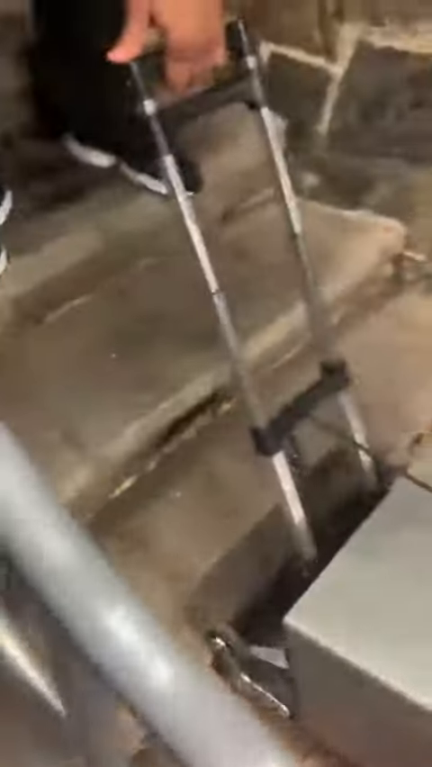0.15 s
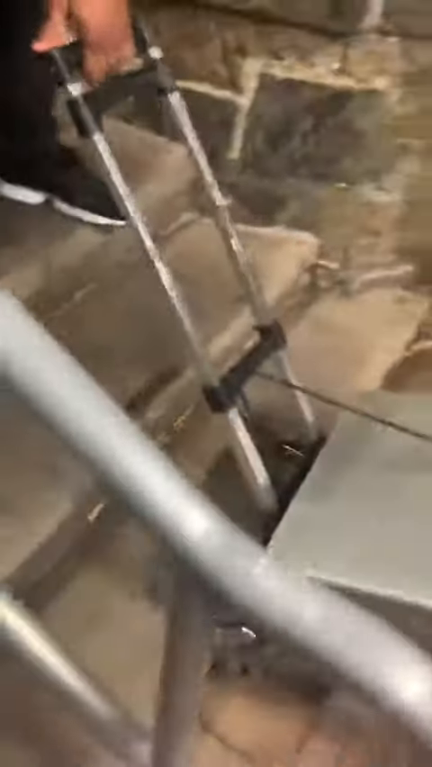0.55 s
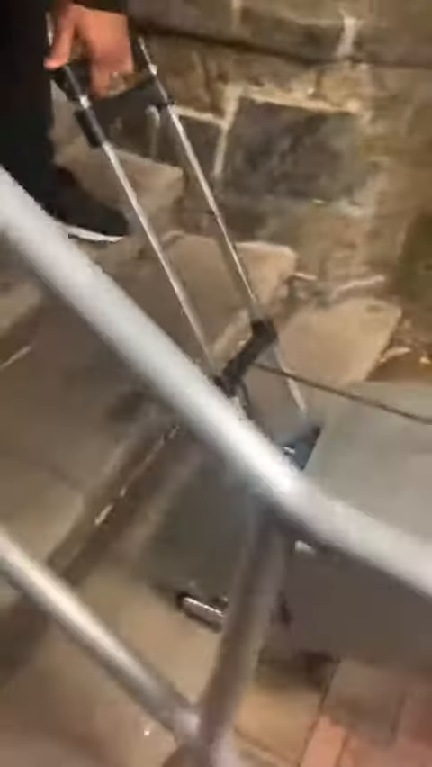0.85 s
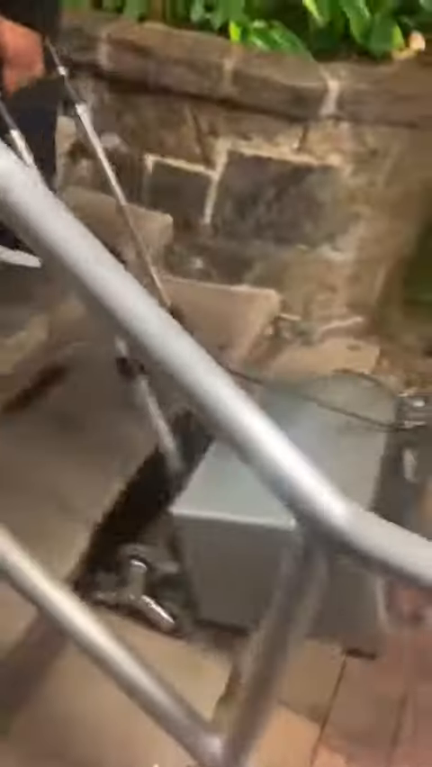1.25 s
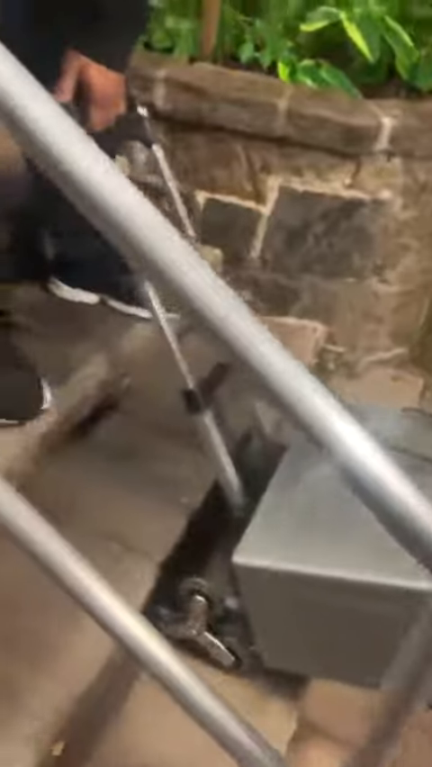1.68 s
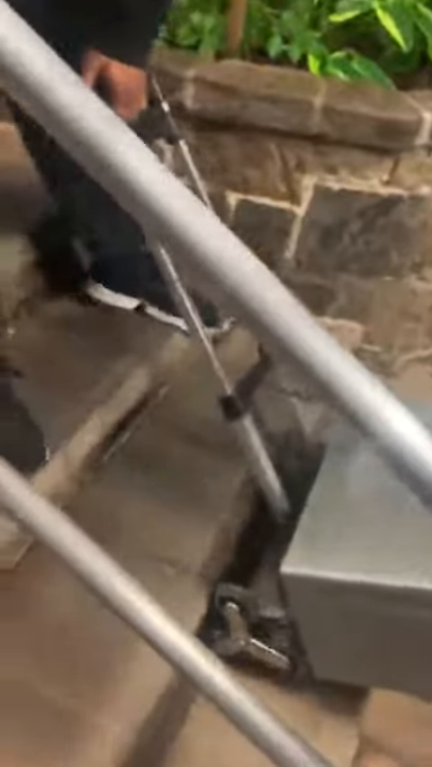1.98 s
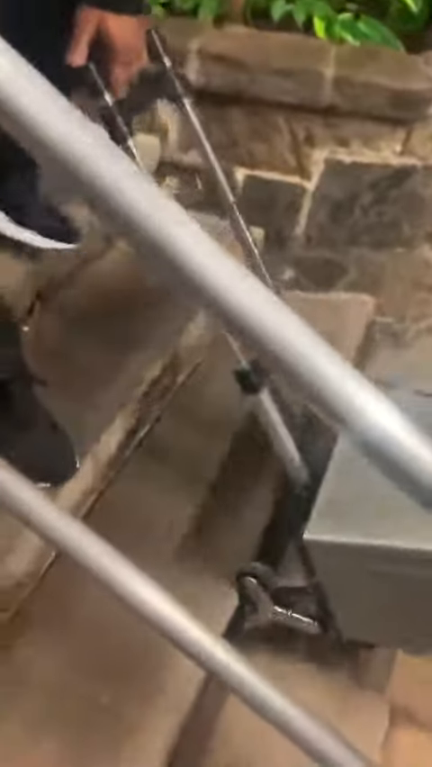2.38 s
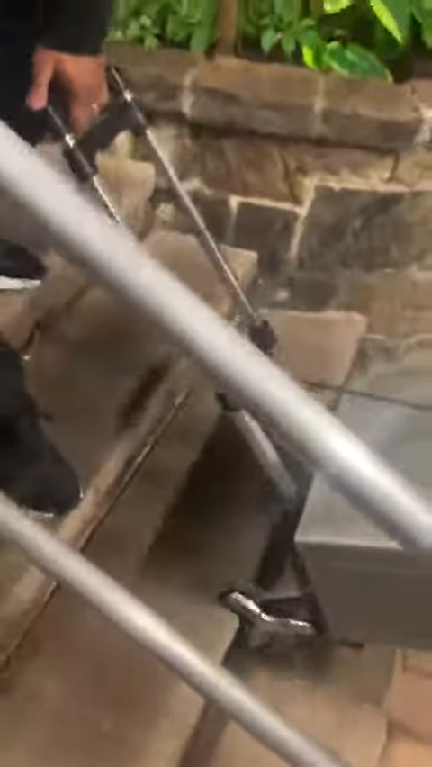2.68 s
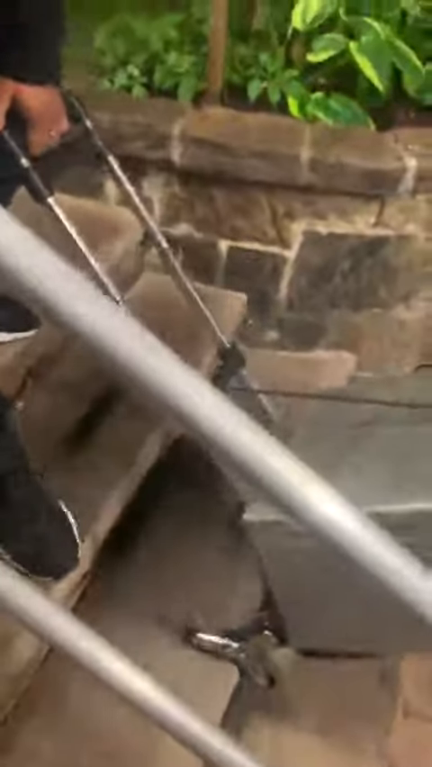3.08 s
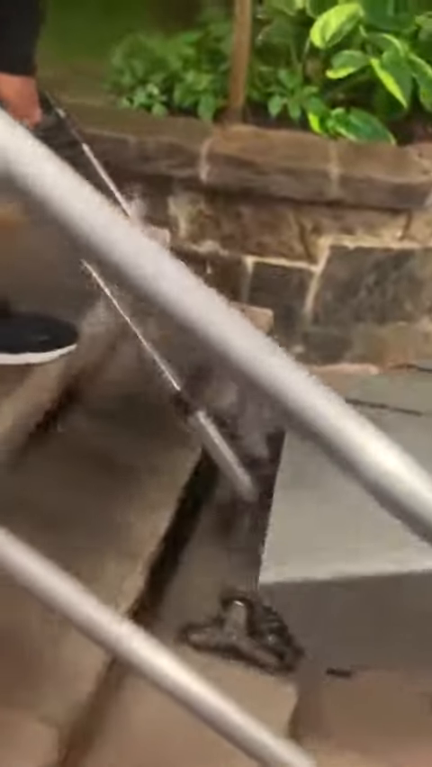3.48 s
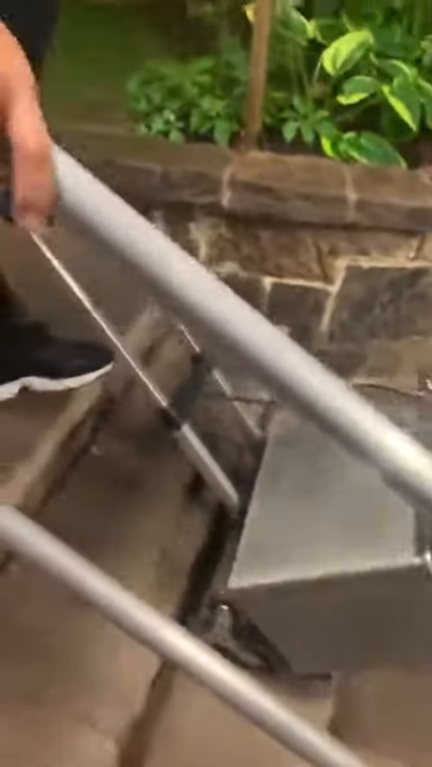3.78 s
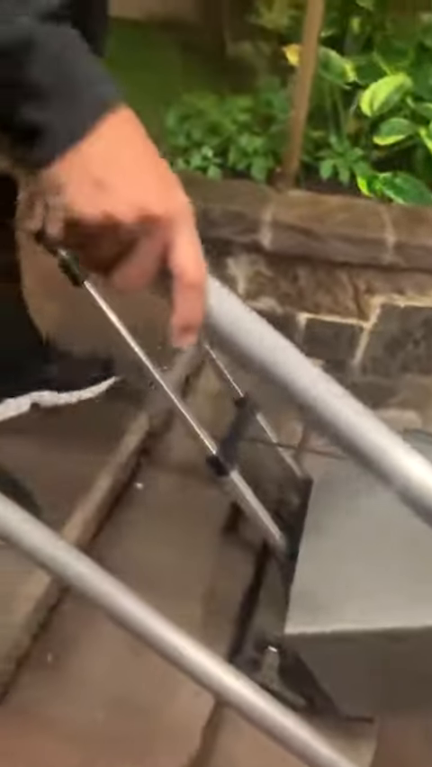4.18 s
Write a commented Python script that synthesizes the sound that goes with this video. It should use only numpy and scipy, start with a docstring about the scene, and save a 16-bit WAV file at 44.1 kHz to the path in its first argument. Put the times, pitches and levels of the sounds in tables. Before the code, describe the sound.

Close stereo pickup of a metal trolley jolting up steps: metallic frame knocks, boxy low thuds and a bright jingle of loose contents. Strong impacts come early, again around a third of the way in, and heaviest in a rapid tumble near the end, with quieter rattles and rolling between. Distant traffic rumble and light low wind continue throughout, with brief hard reflections nearby.

```python
"""Traffic hum, light wind and faint rolling are heard from the start and run throughout.
Over them a hand truck with a sheet-metal box bumps up outdoor stone steps.
Each jolt makes a pitched knock and thud; shaped noise makes the box boom, frame clatter and contents jingle.
The hum and wind are filtered noise. Short echoes follow the truck, and phase differences widen the stereo."""
import sys
import numpy as np
from scipy import signal
from scipy.fft import rfft, irfft, next_fast_len
from scipy.io import wavfile
from scipy.ndimage import uniform_filter1d

SR = 44100
rng = np.random.default_rng(int(sys.argv[2]) if len(sys.argv) > 2 else 0)


def put_to_file(sound):
    """Save the sound as 16-bit audio at rate SR, in the file named by the first command-line argument."""
    columns = np.atleast_2d(sound).T  # one column per channel
    safe = np.clip(columns, -1, 1)
    whole_steps = np.round(safe * 32767)
    wavfile.write(sys.argv[1], SR, whole_steps.astype(np.int16))


N = 191614  # length in samples


def undb(db):
    """Turns decibels into an amplitude factor."""
    return 10 ** (np.asarray(db) / 20)


def unit(x):
    """Scales a signal to rms 1."""
    return x / np.sqrt(np.mean(x ** 2))


def shaped(x, gain_at):
    """Filters a sound by multiplying its spectrum by gain_at(Hz)."""
    size = next_fast_len(N + SR // 4)
    hz = np.arange(size // 2 + 1) * SR / size
    return irfft(rfft(x, size) * gain_at(hz), size)[..., :N]


def colour(x, table):
    """Filters a sound along a curve drawn through (Hz, dB) points."""
    hz, db = np.transpose(table)
    return shaped(x, lambda f: undb(np.interp(np.log(f + 1), np.log(hz), db)))


def ring(modes):
    """Response of a set of resonances (Hz, width Hz, dB); neighbours move in opposite sense."""
    def response(f):
        total = 0
        for k, (hz, width, db) in enumerate(modes):
            resonance = 1j * f * width / (hz ** 2 - f ** 2 + 1j * f * width)
            total = total + (-1) ** k * undb(db) * resonance
        return total
    return response


def through(x, modes):
    """Rings the resonances, scaled so that plain noise of rms 1 stays at about rms 1."""
    response = ring(modes)
    power = np.mean(np.abs(response(np.linspace(0, SR / 2, 8192))) ** 2)
    return shaped(x, response) / np.sqrt(power)


def walk(rate):
    """A slow random drift with rms 1, given a fresh target about `rate` times a second."""
    k = int(SR / rate)
    steps = np.repeat(rng.standard_normal(N // k + 1), k)
    smooth = uniform_filter1d(uniform_filter1d(steps, k), k)
    return unit(smooth[:N])


# The tone of the traffic hum. Each row: frequency in Hz, relative strength in dB per Hz.
TRAFFIC_TONE = [(25, -19), (60, 7), (100, -9.5), (200, -16.5), (500, -16.5), (1200, -19), (2000, -22.5),
                (3000, -24), (6500, -27.5), (10000, -49.5), (16000, -122)]
TRAFFIC_DB = -44  # middle level, before the stereo stage


def town():
    """Traffic hum: coloured noise that swells a little."""
    hum = unit(colour(rng.standard_normal((2, N)), TRAFFIC_TONE))
    return hum * undb(TRAFFIC_DB + 0.4 * walk(1.87) + 2.4 * walk(10.05))


WIND_DB, WIND_HZ = -41.5, 70


def wind():
    """Low buffeting: gusty noise through a low resonance used twice, unrelated at left and right."""
    gust = rng.standard_normal((2, N)) * undb(4.8 * walk(5.02))
    resonance = ring([(WIND_HZ, 70, 0)])
    return unit(shaped(gust, lambda f: resonance(f) ** 2)) * undb(WIND_DB)


# The rolling between bumps. Each row: time in seconds, then relative levels in dB of
# box boom, frame clatter and jingle.
ROLLING_LEVELS = [(0, -46, -48, -49), (0.25, -49, -48, -68), (0.32, -45, -43, -58), (0.76, -48, -46, -51),
                  (0.98, -47, -47, -53), (1.04, -41, -47, -54), (1.22, -41, -49, -61),
                  (1.29, -50, -47, -64), (1.86, -42, -46, -56), (1.95, -48, -48, -70),
                  (2.03, -42, -43, -57), (2.3, -45, -52, -56), (2.6, -44, -45, -54), (2.85, -55, -46, -56),
                  (3.19, -49, -48, -72), (3.25, -48, -44, -54), (4.05, -43, -45, -58),
                  (4.27, -46, -48, -74), (4.34, -45, -44, -53)]
# Swells of rattling around the bumps. Each row: start in seconds, rise in seconds, time for the frame
# to fall 60 dB in seconds, relative levels in dB of boom, clatter and jingle, favoured box pitch in Hz.
RATTLE_SWELLS = [(0.32, .02, .6, -31, -28, -34, 190), (0.415, .015, 1.0, -20, -23, -25, 240),
                 (0.54, .04, .55, -30, -32, -28, 125), (1.298, .02, .7, -21, -25, -27, 240),
                 (1.45, .07, .9, -24, -29, -26, 260), (1.70, .03, .9, -32, -38, -40, 120),
                 (2.375, .05, .5, -39, -34, -42, 190), (2.92, .08, .4, -33, -38, -50, 130),
                 (3.26, .02, .3, -46, -42, -40, 140), (3.335, .025, 1.5, -40, -37, -41, 160),
                 (3.42, .06, .2, -29, -36, -42, 200), (3.495, .035, .35, -16, -18, -25, 230),
                 (3.59, .045, .5, -19, -22, -21, 290), (3.72, .06, 1.1, -26, -29, -26, 250)]
# The favoured pitch sags after the start of each swell, and rests low while rolling.
REST_HZ, SAG_OCT_PER_S = 135, 2.5
# Box and contents die away in these shares of the time that the frame takes.
BOX_FALLS, CONTENTS_FALL = .62, .85


def shaking():
    """Adds rolling and swells in power; gives boom, clatter and jingle amplitudes and box pitch."""
    t = np.arange(N) / SR
    s, *columns = np.transpose(ROLLING_LEVELS)
    power = np.array([undb(2 * np.interp(t, s, c)) for c in columns])
    octaves = np.zeros(N)
    pace = np.array([[BOX_FALLS], [1], [CONTENTS_FALL]])
    for start, rise_s, t60_s, *levels_db, hz in RATTLE_SWELLS:
        since = np.maximum(t - start, 0)
        rise = np.minimum(since / max(rise_s, .002), 1)
        fall = undb(-60 * np.maximum(since - rise_s, 0) / (t60_s * pace))
        part = (undb(levels_db)[:, None] * rise * fall) ** 2
        power = power + part
        # louder booms pull the favoured pitch more strongly
        octaves += part[0] * np.maximum(np.log2(hz / REST_HZ) - SAG_OCT_PER_S * since, 0)
    boom, rattle, tinkle = np.sqrt(power)
    return boom, rattle, tinkle, REST_HZ * 2 ** (octaves / power[0])


def contacts(rate, spread_db, smooth):
    """Two sets of small collisions of unequal size over a smooth hiss, rms 1."""
    hit = rng.random((2, N)) < rate / SR
    size_db = spread_db * np.minimum(rng.exponential(size=(2, N)), 2.5)
    size = undb(size_db) * rng.standard_normal((2, N))
    return unit(unit(hit * size) + smooth * rng.standard_normal((2, N)))


# Resonances of the box panels. Each row: pitch in Hz, width in Hz, relative strength in dB.
BOX_MODES = [(115, 15, 1.5), (175.5, 38, -1), (223, 59, 0), (274, 18.6, -3.5), (325, 41, -9),
             (422, 54, -15), (612, 90, -11)]


def box(drive, favoured_hz, focus_oct):
    """Panels boom; the resonances near one moving pitch are favoured."""
    gains = []
    for hz, _, db in BOX_MODES:
        near = np.exp(-(np.log2(hz / favoured_hz) / focus_oct) ** 2) + 0.24
        gains.append(near * undb(db))
    total = np.sqrt(sum(g ** 2 for g in gains))
    return sum(through(drive * g / total, [mode]) for g, mode in zip(gains, BOX_MODES))


# The jolts. Each row: start in seconds, frame level in dB, knock pitch in Hz, box level in dB,
# jingle level in dB, thud pitch in Hz. Levels are relative, before each sound's own trim.
JOLTS = [(0.118, -31, 840, -44, -33, 180), (0.161, -29.5, 1390, -35.5, -46.5, 99),
         (0.306, -35, 1380, -36, -64, 98), (0.329, -12.5, 1480, -22, -26.5, 500),
         (0.422, -6, 1510, -12, -28, 250), (0.454, -13, 1320, -10, -28, 223),
         (0.558, -17.5, 1400, -17.5, -36, 120), (0.62, -23, 1410, -15.5, -42, 120),
         (0.768, -23, 1050, -32, -56, 326), (0.902, -30.5, 1070, -48, -43, 96),
         (1.019, -30.5, 797, -26, -62, 119), (1.309, -2, 1413, -6.5, -18, 254),
         (1.334, -17, 2070, -23, -20, 107), (1.361, -14.5, 1060, -26, -26, 336),
         (1.479, -27, 980, -20, -29, 117), (1.547, -31, 643, -11, -21, 325),
         (1.682, -47, 1430, -32, -31, 290), (1.705, -22, 1510, -18.5, -36.5, 116),
         (1.884, -24.5, 710, -21, -53, 240), (2.008, -21, 1700, -35, -36.5, 94),
         (2.05, -30.5, 1120, -47, -47, 95), (2.186, -31.5, 1360, -27, -37.5, 165),
         (2.372, -24, 1480, -39, -32, 194), (2.404, -29, 1070, -34, -28, 179),
         (2.428, -13.5, 747, -26, -49, 170), (2.616, -27.5, 853, -32, -36, 98),
         (2.833, -26.5, 1190, -62, -37, 108), (2.995, -14, 1480, -26, -43, 560),
         (3.219, -40, 785, -38, -30, 96), (3.235, -31, 1050, -52, -31, 95), (3.27, -33, 1180, -35, -36, 98),
         (3.342, -19, 850, -33, -56, 312), (3.431, -28, 1040, -27, -48, 110),
         (3.496, -8, 1130, -20, -41, 480), (3.513, -4, 1260, -31, -20, 280),
         (3.526, -6, 1300, -15, -29, 188), (3.548, -9, 1510, -11, -34, 287),
         (3.621, -9.5, 1360, -11, -22, 291), (3.718, -26, 1140, -15, -21.5, 272),
         (3.742, -27, 1220, -9.5, -45, 225), (3.793, -22, 1260, -18.5, -25, 135)]
FRAME_LEVEL, KNOCK_PITCH, BOX_LEVEL, JINGLE_LEVEL, THUD_PITCH = 1, 2, 3, 4, 5  # column numbers


def blows(level, pitch, damping, steep, rise_s, blow_db):
    """Each jolt leaves a dying tone at a pitch set by where the blow lands."""
    t, out = np.arange(SR // 3) / SR, np.zeros(N + SR)
    for row in JOLTS:
        at, hz = int(row[0] * SR), row[pitch]
        # with steep above 0, lower tones ring on for more cycles
        loss = damping * hz * (hz / 200) ** steep
        shape = (1 - np.exp(-t / rise_s)) * np.exp(-loss * t)
        out[at:at + len(t)] += undb(row[level] + blow_db) * np.sin(2 * np.pi * hz * t) * shape
    return out[:N]


# Time to fall 60 dB after a 0 dB jolt, and its growth with level; both are then times `stretch`.
FALL_S, LONGER_S_PER_DB = .075, .0008


def burst(column, rise_s, stretch):
    """Power of all jolts over time: a quick rise, then a fall that lasts longer after harder blows."""
    t, out = np.arange(SR // 3) / SR, np.zeros(N + SR)
    for row in JOLTS:
        at = int(row[0] * SR)
        t60_s = stretch * max(FALL_S + LONGER_S_PER_DB * row[column], .01)
        fall = np.exp(-np.log(1000) * t / t60_s)
        out[at:at + len(t)] += (undb(row[column]) * (1 - np.exp(-t / rise_s)) * fall) ** 2
    return out[:N]


def cracks(push_s, crack_db):
    """The first contact of each jolt: one short push that sets the whole frame ringing at once."""
    out = np.zeros(N)
    for row in JOLTS:
        out[int(row[0] * SR)] += undb(row[FRAME_LEVEL] + crack_db)
    push = np.hanning(int(push_s * SR) + 3)
    return np.convolve(out, push / np.sum(push))[:N]


# The tone of the jingle. Each row: frequency in Hz, relative strength in dB per Hz.
JINGLE_TONE = [(400, -80), (1500, -10), (3000, -2), (5000, 7.5), (8500, 7.5), (9400, 3.5), (10000, 4.5),
               (13000, -10.5), (16000, -12)]


def ticks(loose, flicker_db, rate):
    """Different pieces shift at different moments, so each range of the jingle flickers alone."""
    mixed = 0
    for k, hz in enumerate((1950, 3890, 6480, 9190, 13170)):
        flickering = loose * undb(flicker_db * walk(rate))
        mixed = mixed + (-1) ** k * shaped(flickering, ring([(hz, hz * 0.85, 0)]))
    return colour(mixed, JINGLE_TONE)


# Resonances of the frame. Each row: pitch in Hz, width in Hz, relative strength in dB.
FRAME_MODES = [(480, 93, -3.5), (634, 68, -5.5), (722, 97, -2.5), (889, 88, 0), (1039, 66, 1.5),
               (1148, 35, -0.5), (1204, 30, 0), (1401, 144, 2), (1703, 200, -2.5), (1921, 98, -2),
               (2330, 240, -9.5), (2698, 117, -8), (3365, 650, -9.5)]
# Resonances of the loose contents. Each row: pitch in Hz, width in Hz, relative strength in dB.
CONTENTS_MODES = [(4440, 180, 42.5), (4260, 240, -72), (5840, 20, -62), (6530, 55, 6), (8100, 240, 34.5)]


def truck():
    """Shaking and jolts drive collisions that ring box, frame and contents, plus knocks and thuds."""
    boom, rattle, tinkle, favoured_hz = shaking()
    # shaking and jolts add in power
    clatter = np.sqrt(rattle ** 2 + undb(-8.5) * burst(FRAME_LEVEL, 0.0015, 0.55))
    jingle = np.sqrt(tinkle ** 2 + undb(5.5) * burst(JINGLE_LEVEL, 0.00057, 0.91))
    panels = box(boom * contacts(300, 1.4, 0.78), favoured_hz, focus_oct=0.29)
    thuds = blows(BOX_LEVEL, THUD_PITCH, damping=.2, steep=0.61, rise_s=0.0028, blow_db=-4.5)
    collisions = clatter * contacts(600, 2.6, 0.98)
    frame = through(collisions + cracks(push_s=.00015, crack_db=15.52), FRAME_MODES)
    knocks = blows(FRAME_LEVEL, KNOCK_PITCH, damping=0.33, steep=0, rise_s=0.00024, blow_db=-3.4)
    loose = jingle * contacts(3000, 1.4, 1.5)
    # most of the contents only tick; a few pieces ring
    ticking = ticks(loose, flicker_db=.9, rate=40) * undb(10.5)
    ringing = through(loose, CONTENTS_MODES) * undb(-3)
    return panels + thuds + frame * undb(-2.77) + knocks + ticking + ringing


def stairwell(x, t60_s, wet_db):
    """A short spray of echoes from steps and wall: softened noise that dies away."""
    t = np.arange(SR // 4) / SR
    fall = np.exp(-np.log(1000) * t / t60_s) * (t > .003)
    tail = rng.standard_normal((2, len(t))) * fall
    tail = signal.lfilter([.6], [1, -.4], tail)  # dulls the treble
    tail = undb(wet_db) * tail / np.sqrt(np.sum(tail[0] ** 2))
    return x + signal.fftconvolve(x, tail, axes=1)[:, :N]


# Stereo phase curve. Each row: frequency in Hz, phase difference between left and right in half turns.
STEREO_PHASE = [(0, .08), (300, .06), (650, .22), (1500, .05), (2300, .5), (3700, .6), (4300, .98),
                (5050, 1.02), (5700, 1.45), (6500, 1.98), (7100, 2.02), (7900, 2.5), (8650, 2.99),
                (9300, 3.01), (9800, 3.4), (11200, 2.9), (11800, 3.5), (12600, 3.98), (13400, 4.03),
                (14300, 4.6), (15000, 4.9), (16000, 5)]
# Stereo level curve. Each row: frequency in Hz, left minus right in dB.
STEREO_BALANCE = [(60, 0), (380, -3.5), (1300, -0.9), (2400, -1.8), (4400, 0)]


def stereo(first, second, direct):
    """The phase curve shares sound between the sum and difference of left and right.

    The difference also takes a second rendition of the scene, with its own random collisions, echoes and hum
    but the same knocks, thuds, cracks and swells, which widens the stereo."""
    hz, turns = np.transpose(STEREO_PHASE)
    half = lambda f: np.interp(f, hz, turns) * np.pi / 2  # half the phase difference, in radians
    along = shaped(first, lambda f: np.cos(half(f)))
    mixed = direct * first + np.sqrt(1 - min(direct, 1) ** 2) * second
    across = shaped(mixed, lambda f: 1j * np.sin(half(f)))
    left = colour(along + across, [(f, db / 2) for f, db in STEREO_BALANCE])
    right = colour(along - across, [(f, -db / 2) for f, db in STEREO_BALANCE])
    return np.array([left, right])


def scene():
    """Two renditions of echoing truck and traffic are spread to stereo; wind is added to each side."""
    first, second = stairwell(truck(), t60_s=.12, wet_db=-10) + town()
    return stereo(first, second, direct=0.72) + wind()


TOP_HZ = 15620


def record(dry):
    """Loud peaks are rounded; the sound holds little above TOP_HZ."""
    rounded = np.tanh(dry)
    low_pass = signal.ellip(10, .2, 70, TOP_HZ, fs=SR, output="sos")
    return signal.sosfilt(low_pass, rounded)


dry = scene()
out = record(dry)
put_to_file(out)
```